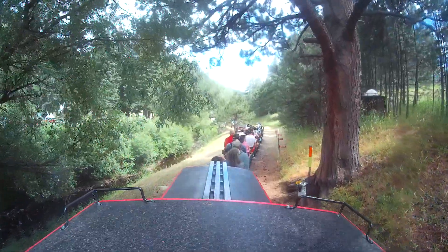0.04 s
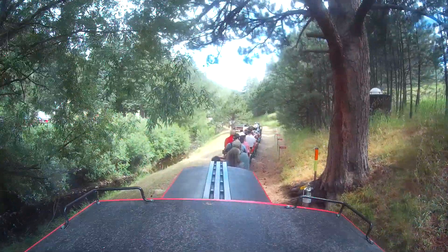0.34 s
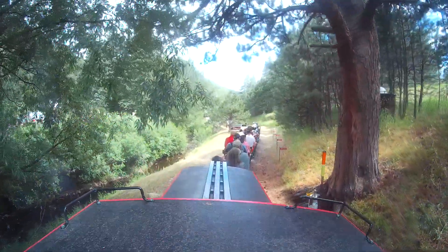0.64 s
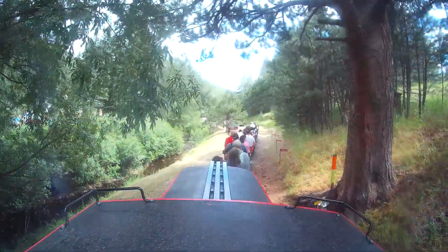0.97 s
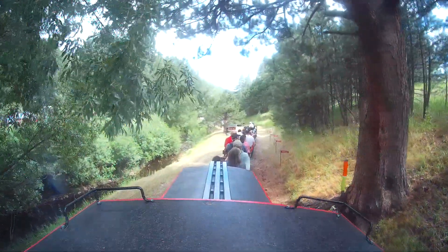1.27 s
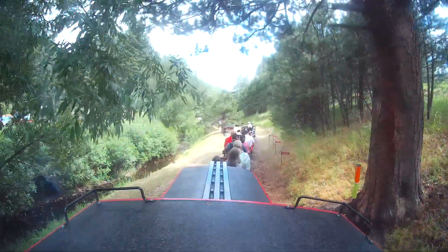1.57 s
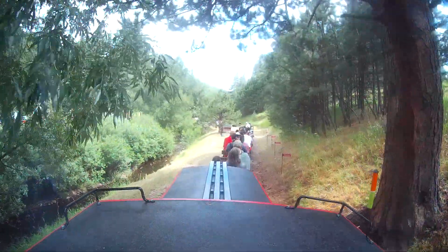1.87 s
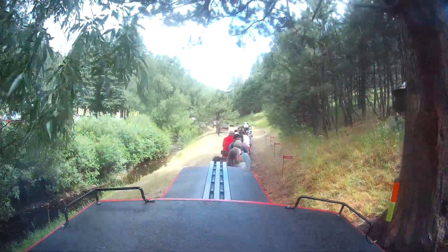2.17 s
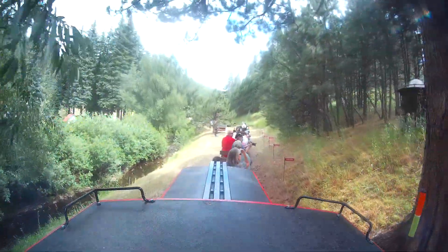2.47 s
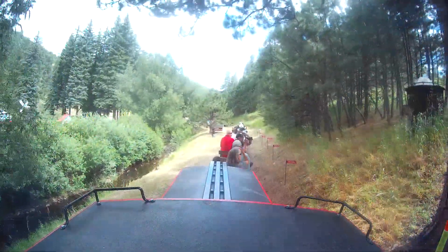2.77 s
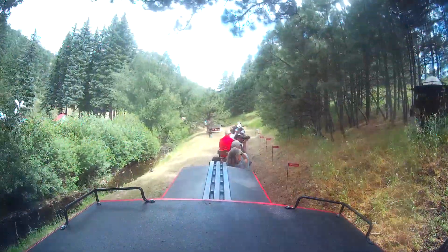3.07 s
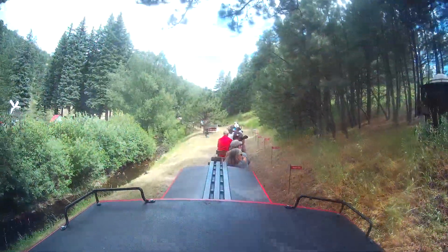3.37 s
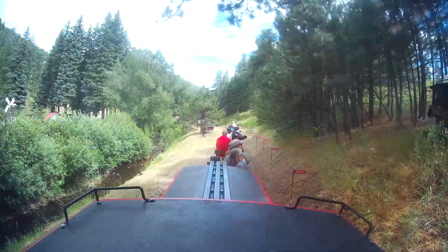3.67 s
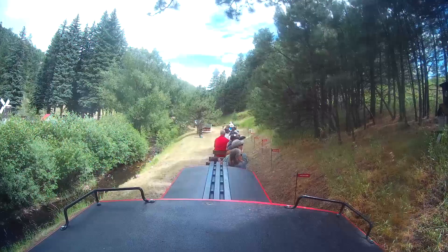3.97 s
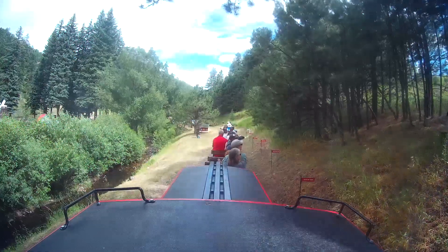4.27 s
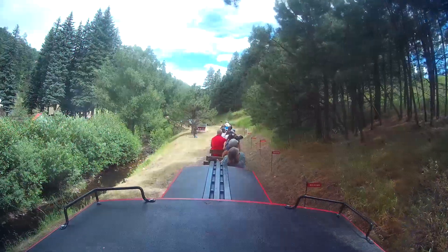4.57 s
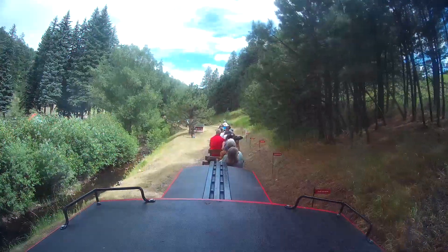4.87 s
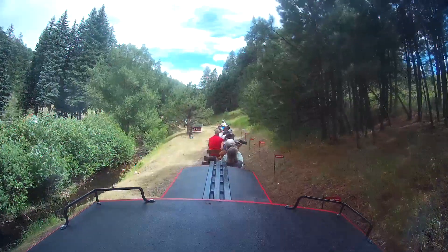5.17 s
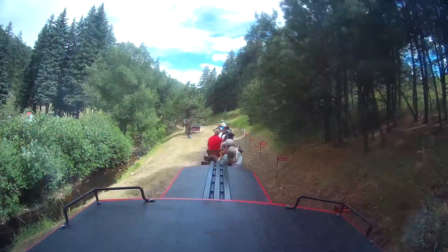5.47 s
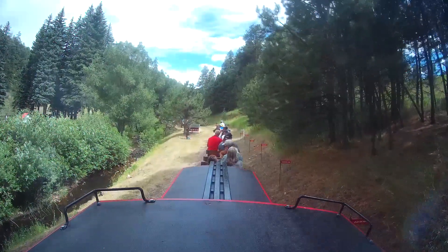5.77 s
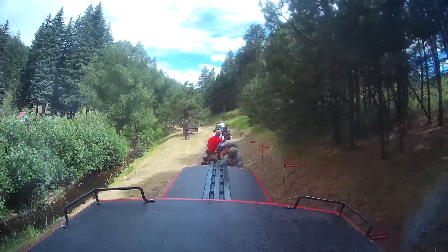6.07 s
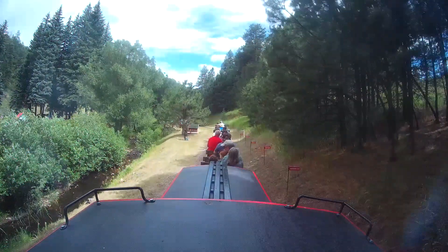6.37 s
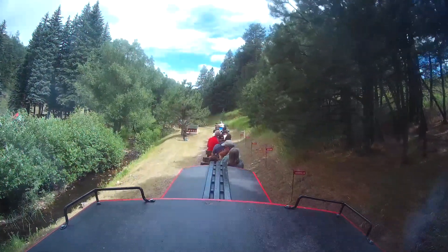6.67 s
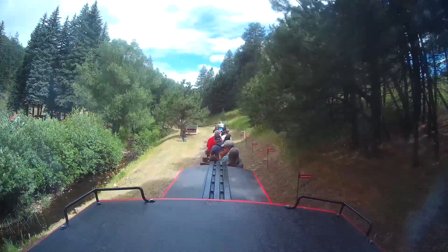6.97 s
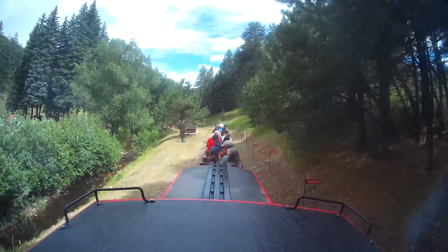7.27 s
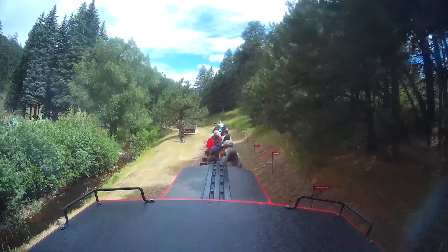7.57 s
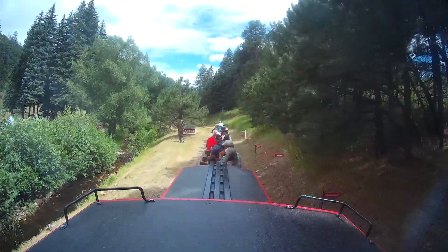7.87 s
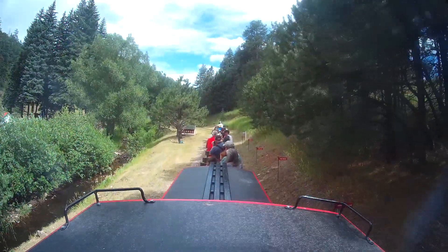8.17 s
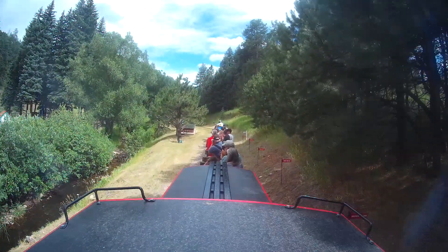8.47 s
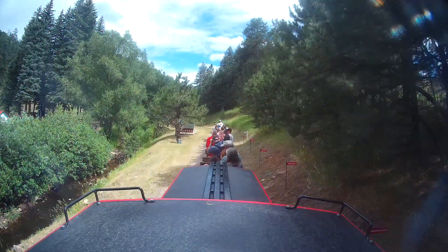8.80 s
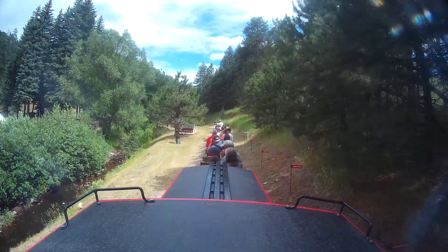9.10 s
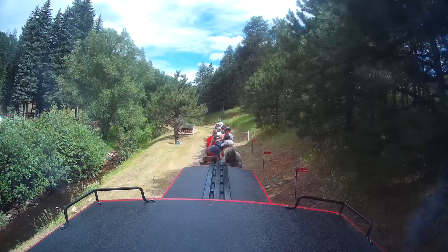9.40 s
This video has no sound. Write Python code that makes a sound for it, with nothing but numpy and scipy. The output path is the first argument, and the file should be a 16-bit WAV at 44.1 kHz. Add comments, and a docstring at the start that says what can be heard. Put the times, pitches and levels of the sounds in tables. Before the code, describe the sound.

Heard from on board, a small ridable train drones and booms unevenly, with occasional thuds and light clinks over a faint hiss and whine.

```python
"""A miniature train rolls through woods, heard from the roof of one of its cars.
The wheels keep the hollow body booming on two low notes, harder on each rough spot, and make the
rails sing. Over a hiss and a thin electric whine, rail joints thump, couplings knock and a loose
fitting clinks. The recorder's noise suppressor lets the treble swell with each boom."""
import sys
import numpy as np
from scipy import signal
from scipy.fft import rfft, irfft
from scipy.io import wavfile
from scipy.ndimage import uniform_filter1d

SR = 44100
rng = np.random.default_rng(int(sys.argv[2]) if len(sys.argv) > 2 else 0)


def dump(signal):
    """Clip the signal to [-1, 1] and save it as 16-bit WAV at the path in sys.argv[1]."""
    limited = np.clip(np.atleast_2d(signal).T, -1, 1)
    pcm = np.round(limited * 32767).astype(np.int16)
    wavfile.write(sys.argv[1], SR, pcm)


N = 416304

# Levels in the tables are relative: the functions set how loud each sound ends up.
# how hard the wheels roar: time_s, level_db
ROLLING = [(0, -58.5), (1.6, -59.5), (4.3, -58.5), (5, -61.5), (5.35, -59.5), (5.95, -61.5), (6.2, -64),
           (7.6, -64), (8.1, -60.5), (8.33, -66.5), (9.44, -67)]
# how much the frame sways on its springs: time_s, level_db
FRAME_SWAY = [(0, -38), (0.6, -49.5), (1.35, -50), (2.15, -46), (2.6, -53.5), (3.2, -45), (3.6, -42),
              (4.65, -65), (5.55, -44), (6.3, -55), (6.75, -50), (7.15, -55), (7.9, -40), (8.1, -35),
              (8.35, -50), (9.44, -49)]
# how strongly the rails sing: time_s, level_db
RAIL_SONG = [(0, -62), (1.4, -63), (1.6, -62), (1.82, -57), (1.92, -58.5), (2.15, -62.5), (2.3, -59.5),
             (2.45, -60.5), (3, -61.5), (3.25, -61.5), (4.4, -62.5), (5.75, -64), (5.96, -59),
             (6.25, -65.5), (7.8, -64.5), (8.1, -66), (8.8, -65.5), (9.44, -68)]
# rough rail that makes the body boom: start_s, length_s, low_boom_db, upper_boom_db
ROUGH_RAIL = [(0.142, 0.065, -31.0, -32.5), (0.199, 0.064, -37, -28), (0.335, 0.017, -32.5, -40.5),
              (0.56, 0.04, -34, -29), (0.895, 0.037, -31.5, -30.5), (1.047, 0.088, -30, -43),
              (1.193, 0.075, -30.5, -48), (1.478, 0.16, -30, -40), (1.586, 0.19, -32.5, -37),
              (1.993, 0.11, -35, -35.5), (2.16, 0.16, -32.0, -36.5), (2.362, 0.13, -27.5, -39.5),
              (2.578, 0.1, -31.0, -38), (2.694, 0.16, -34.0, -34), (3.064, 0.045, -32.5, -48),
              (3.16, 0.15, -31, -37.5), (3.415, 0.098, -39.5, -36.5), (3.5, 0.16, -29.5, -38),
              (3.765, 0.085, -35, -37.5), (4, 0.13, -28, -37), (4.16, 0.16, -31, -39.0),
              (4.42, 0.067, -32, -41.5), (4.578, 0.055, -33.5, -45), (4.725, 0.039, -30.5, -44),
              (4.826, 0.029, -36, -45.5), (5.004, 0.043, -40.5, -32.5), (5.278, 0.14, -36.5, -37.5),
              (5.562, 0.054, -28.0, -47), (5.67, 0.04, -37, -39.5), (5.894, 0.1, -34.5, -34.5),
              (6.689, 0.091, -34.5, -42), (6.853, 0.16, -36.5, -40), (7.032, 0.12, -35.5, -44.5),
              (7.208, 0.084, -30.5, -39), (7.453, 0.088, -39.5, -35), (7.715, 0.08, -36, -36),
              (7.963, 0.044, -31, -30.5), (8.03, 0.135, -29.0, -36.5), (8.37, 0.17, -35, -42)]
# wheels dropping into rail joints: start_s, thump_db, rattle_db
RAIL_JOINTS = [(0.534, -23, -38.5), (0.896, -24, -41), (1.516, -26, -46), (3.144, -21, -56),
               (3.505, -22, -40.5), (5.35, -24, -52), (5.534, -28, -40), (5.895, -26.5, -63),
               (7.964, -27, -45), (8.076, -25, -48)]
# knocks of the slack couplings between cars: start_s, level_db
COUPLING_KNOCKS = [(0.555, -57), (5.325, -56), (5.705, -51), (7.711, -54), (7.96, -62)]
# clinks of a loose metal fitting: start_s, level_db
FITTING_CLINKS = [(0.5651, -61), (3.1353, -60), (3.1732, -59), (3.5448, -57), (3.5698, -60), (3.6426, -64),
                  (3.6626, -59), (8.0436, -64), (8.0814, -57.5), (8.2194, -61)]
# notes of the parts that the rolling keeps shaking: pitch_hz, width_hz, level_db
FRAME_NOTES = [(52.7, 6.8, -7), (64.9, 12.7, -5.5)]
LOW_BOOM_NOTES = [(92.84, 5.16, 5.5), (90.5, 24, -13), (111.9, 22.3, -12)]
UPPER_BOOM_NOTES = [(170.04, 6.16, 1.5), (174.4, 28.3, -10), (201.4, 24, -24)]
PANEL_NOTES = [(236.5, 26, -2), (271, 42, -6), (308.4, 17.3, 0.5), (322.8, 16.1, 1.5), (348.5, 30, -11)]
WHEEL_NOTES = [(792.3, 35, -0.5), (821, 32, -11), (853, 50, -6.5)]
RAIL_NOTES = [(1080, 44, -7.5), (1177.7, 36, 1.5), (1239, 86, -1), (1297, 75, -7), (1445, 64, -5.5)]
# notes that ring after a blow: pitch_hz, level_db, ring_s (time to fade by 60 dB)
JOINT_NOTES = [(64.3, -4, .15), (93, 4.5, 0.13), (119, -2, 0.036), (181.8, -2.5, 0.28), (199.5, -1.5, 0.06),
               (230, -7.5, 0.039), (322.5, -8.5, 0.057)]
COUPLING_NOTES = [(455, -2, 0.037), (517, 3.5, 0.16), (563, 1, 0.054), (640, -7, .04)]
FITTING_NOTES = [(1800, -16, .008), (2700, -17, .01), (3410, 0, .05), (3520, -8, .025), (4300, -16, .012),
                 (5300, -20, .012)]
# tone of the wheels' roar, their grit and the hiss, from bass to treble: pitch_hz, level_db
ROAR_TONE = [(15, -2), (45, 7), (230, 3), (395, 1.5), (420, -2), (485, 1.5), (510, 2), (540, 3), (600, -3),
             (645, -2.5), (690, -6), (850, -7), (920, -7.5), (1050, -9.5), (1400, -41)]
GRIT_TONE = [(700, -34), (1100, 3.5), (1500, 1), (1700, -0.5), (2000, -1.5), (2130, -1), (2350, -9),
             (3400, -9.5), (6000, -16.5), (15000, -36)]
HISS_TONE = [(500, 6), (2500, 3), (4000, 0), (6000, -2), (9000, -3), (14000, -4.5), (15000, -5),
             (15700, -15)]
# close notes of the electric whine: pitch_hz, level_db
WHINE_NOTES = [(8578.5, -26.5), (8628.7, -17.2), (8679, -17.4), (8729.3, -25)]

USUAL_ROAR_DB = -60
WAVER_DB, WAVER_PER_S = 3.5, 12.7  # small bumps in the rail make the booms waver
SPOT_RISE_S, SPOT_FALL_S = 0.0167, 0.027
DIP_DB, DIP_AFTER_S, DIP_HALF_S = -2.5, 0.042, 0.028
PANEL_SHARE, WHEEL_SHARE = 0.13, 0.21  # how much of a boom's swell in dB reaches these parts
GATE_THRESHOLD_DB, GATE_RANGE_DB, GATE_DEPTH_DB = -34, 6.5, 4.5  # the gate is the noise suppressor
GATE_LISTEN_S, GATE_OPEN_S, GATE_CLOSE_S, GATE_EDGE_HZ = 0.016, 0.1, 0.087, 770
CUTOFF_HZ = 15700


def from_db(db):
    """Turn decibels into a number to multiply a sound by."""
    return np.exp(np.asarray(db) * np.log(10) / 20)


def unit_power(x):
    """Scale a sound so that its average power is 1."""
    return x / np.sqrt(np.mean(x ** 2) + 1e-20)


def curve(points):
    """Join points (time_s, level_db) with straight lines, giving a level for every sample."""
    return np.interp(np.arange(N) / SR, *np.transpose(points))


def drift(per_s):
    """A smooth random wobble that changes about so many times a second."""
    smooth = signal.butter(2, per_s, fs=SR, output="sos")
    return unit_power(signal.sosfilt(smooth, rng.standard_normal(N + SR))[SR:])


def fading(events, fade_s):
    """A strength that jumps at each event (start_s, level_db) and dies away."""
    kicks = np.zeros(N)
    for start_s, db in events:
        kicks[int(start_s * SR)] += from_db(db)
    return signal.lfilter([1], [1, -np.exp(-1 / (fade_s * SR))], kicks + 1e-18)


def shaped_noise(tone):
    """Steady noise with the given balance of bass and treble."""
    hz, level_db = np.transpose(tone)
    all_hz = np.maximum(np.arange(N // 2 + 1) * SR / N, 1)
    gain = from_db(np.interp(np.log(all_hz), np.log(hz), level_db))
    return unit_power(irfft(rfft(rng.standard_normal(N)) * gain, N))


def shaken(notes):
    """The random push of rough rail keeps a part ringing at its own notes."""
    out = 0
    for hz, width, level_db in notes:
        band = signal.butter(2, [hz - width / 2, hz + width / 2], "band", fs=SR, output="sos")
        out = out + from_db(level_db) * signal.sosfilt(band, rng.standard_normal(N + SR))[SR:]
    return unit_power(out)


def evened(x, span_s):
    """Hold the strength of a vibration even; its pitch and quick flutter still wander."""
    size = int(span_s * SR)
    power = uniform_filter1d(uniform_filter1d(x ** 2, size), size)
    return x / np.sqrt(power + 1e-9)


def boom_level(base_db, spots):
    """The level of one boom in dB: it wavers, and moves to each rough spot's own level."""
    t = np.arange(0, N / SR, 0.001)
    level_db = np.interp(t * SR, np.arange(N), base_db + WAVER_DB * drift(WAVER_PER_S))
    # as a rough spot ends, the body's ringing works against itself and dips briefly
    for start, length, _ in spots:
        from_dip_s = np.abs(t - start - length - DIP_AFTER_S)
        level_db += DIP_DB * np.maximum(1 - from_dip_s / DIP_HALF_S, 0)
    level = from_db(level_db)
    for start, length, spot_db in spots:
        end = start + length
        share = np.interp(t, [start - SPOT_RISE_S, start, end, end + SPOT_FALL_S], [0, 1, 1, 0])
        level += share * (from_db(spot_db) - level)
    return np.interp(np.arange(N) / SR, t, 20 * np.log10(level))


def car_body(low_db, upper_db, panel_db):
    """The frame sways, the hollow shell booms and its panels tremble, rattling after each joint."""
    frame = from_db(curve(FRAME_SWAY) - 3) * evened(shaken(FRAME_NOTES), span_s=0.024)
    low = from_db(low_db + 0.5) * evened(shaken(LOW_BOOM_NOTES), span_s=0.043)
    upper = from_db(upper_db) * evened(shaken(UPPER_BOOM_NOTES), span_s=0.04)
    rattle = fading([(s, db) for s, _, db in RAIL_JOINTS], fade_s=0.056)
    panels = np.hypot(from_db(panel_db), rattle) * evened(shaken(PANEL_NOTES), span_s=0.11)
    return frame + low + upper + panels


def wheels_on_rails(roar_db, rail_db):
    """Steel rolls on steel: a dull roar, ringing wheels, singing rails and uneven grit."""
    roar = from_db(roar_db + 4.5) * shaped_noise(ROAR_TONE)
    wheels = from_db(-66.5 + 1.35 * (roar_db - USUAL_ROAR_DB)) * shaken(WHEEL_NOTES)
    rails = from_db(rail_db) * shaken(RAIL_NOTES)
    grit_db = (roar_db + rail_db) / 2 - 5 + 1.3 * drift(per_s=34)
    return roar + wheels + rails + from_db(grit_db) * shaped_noise(GRIT_TONE)


def hiss_and_whine():
    """A steady hiss, and a thin electric whine whose close notes flutter against each other."""
    t = np.arange(N) / SR
    whine = sum(from_db(db) * np.sqrt(2) * np.sin(2 * np.pi * (hz * t + rng.random()))
                for hz, db in WHINE_NOTES)
    return from_db(-62) * shaped_noise(HISS_TONE) + from_db(-67.5) * whine


def struck(events, notes, spread_db, contact_s):
    """Each blow is a short, rough touch that rings every note with a slightly random strength."""
    start_s, peak_db = np.transpose(events)
    starts = (start_s * SR).astype(int)
    chance_db = spread_db * rng.standard_normal((len(starts), len(notes)))
    age = np.arange(SR // 20) / SR
    contact = rng.exponential(1, len(age)) ** 2 * np.exp(-age / contact_s)
    push = np.pad(np.diff(contact, prepend=0), (0, SR // 4))
    out = np.zeros(N)
    for k, (hz, level_db, ring_s) in enumerate(notes):
        decay, turn = from_db(-60 / (ring_s * SR)), 2 * np.pi * hz / SR  # both per sample
        ring = signal.lfilter([0, np.sin(turn)], [1, -2 * decay * np.cos(turn), decay ** 2], push)
        ring = (-1) ** k * ring / np.abs(ring).max()  # every other note swings the opposite way
        for at, gain in zip(starts, from_db(peak_db + level_db + chance_db[:, k])):
            out[at:at + len(ring)] += gain * ring[:N - at]
    return out


def dulled(x, edge_hz):
    """A blunt blow carries little treble."""
    return signal.sosfilt(signal.butter(2, edge_hz, fs=SR, output="sos"), x)


def joint_thumps():
    """Wheels drop into rail joints and thud dully through the springs."""
    blows = [(s, db) for s, db, _ in RAIL_JOINTS]
    ringing = struck(blows, JOINT_NOTES, spread_db=1.5, contact_s=0.019)
    return from_db(-6) * dulled(ringing, edge_hz=360)


def coupling_knocks():
    """The slack links between the cars knock together."""
    ringing = struck(COUPLING_KNOCKS, COUPLING_NOTES, spread_db=2, contact_s=0.025)
    return from_db(1.5) * dulled(ringing, edge_hz=1000)


def fitting_clinks():
    """A loose metal fitting chatters: each touch gives a bright ring and a short crack."""
    ringing = struck(FITTING_CLINKS, FITTING_NOTES, spread_db=1, contact_s=0.004)
    crack_band = signal.butter(1, (1300, 1900), "band", fs=SR, output="sos")
    noise = unit_power(signal.sosfilt(crack_band, rng.standard_normal(N)))
    cracks = fading(FITTING_CLINKS, fade_s=0.006) * noise
    return from_db(2) * ringing + from_db(3.5) * cracks


def noise_suppressor(x):
    """A soft gate turns the treble down when the whole sound is quiet and opens with each boom."""
    step = SR // 200
    memory = np.exp(-1 / (GATE_LISTEN_S * SR))
    power, _ = signal.lfilter([1 - memory], [1, -memory], x ** 2, zi=[np.mean(x ** 2) / 2])
    heard_db = 10 * np.log10(power[::step] + 1e-12)
    wanted = np.clip((heard_db - GATE_THRESHOLD_DB) / GATE_RANGE_DB + 0.5, 0, 1)  # 0 shut, 1 open
    most_down, most_up = step / SR / GATE_CLOSE_S, step / SR / GATE_OPEN_S
    opening = [wanted[0]]
    for goal in wanted[1:]:
        opening.append(opening[-1] + np.clip(goal - opening[-1], -most_down, most_up))
    opening = np.interp(np.arange(N) / step, np.arange(len(opening)), opening)
    bass = signal.sosfilt(signal.butter(1, GATE_EDGE_HZ, fs=SR, output="sos"), x)
    return bass + from_db(GATE_DEPTH_DB * (opening - 1)) * (x - bass)


def scene():
    """The train carries the listener through open air; rolling and rough spots drive the booms."""
    roar_db = curve(ROLLING)
    extra_roar_db = roar_db - USUAL_ROAR_DB
    # each part of the body has a usual level and follows a share of the extra roar
    low_base_db = -39 + 0.9 * extra_roar_db
    upper_base_db = -40.5 + 0.74 * extra_roar_db
    panel_base_db = -51 + 0.31 * extra_roar_db
    low_db = boom_level(low_base_db, [(s, length, db) for s, length, db, _ in ROUGH_RAIL])
    upper_db = boom_level(upper_base_db, [(s, length, db) for s, length, _, db in ROUGH_RAIL])
    swell_db = low_db - low_base_db
    lift_db = WHEEL_SHARE * swell_db
    rolling = wheels_on_rails(roar_db + lift_db, curve(RAIL_SONG) + lift_db)
    body = car_body(low_db, upper_db, panel_base_db + PANEL_SHARE * swell_db)
    jolts = joint_thumps() + coupling_knocks() + fitting_clinks()
    return (body + rolling + jolts + hiss_and_whine())[None]


def record(dry):
    """The sound passes through the noise suppressor, then its highest treble is cut off."""
    top_cut = signal.ellip(12, 0.1, 80, CUTOFF_HZ, fs=SR, output="sos")
    return signal.sosfilt(top_cut, noise_suppressor(dry[0]))[None]


dry = scene()
out = record(dry)
dump(out)
```